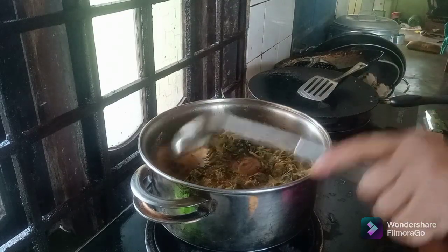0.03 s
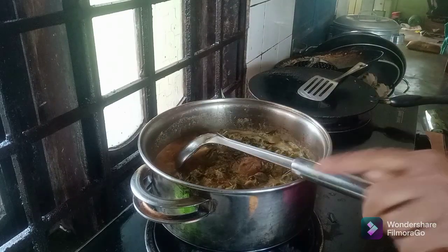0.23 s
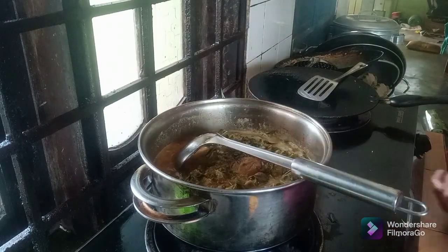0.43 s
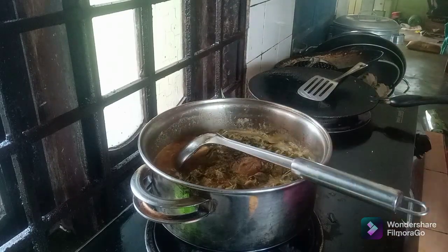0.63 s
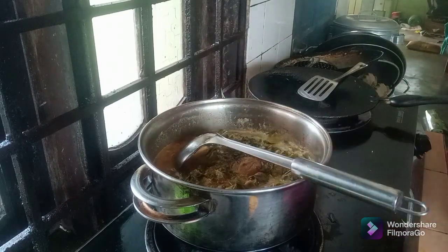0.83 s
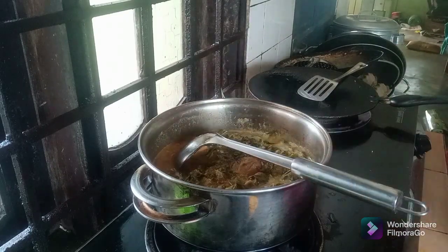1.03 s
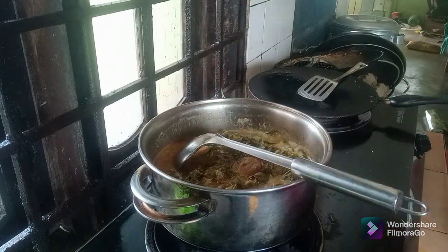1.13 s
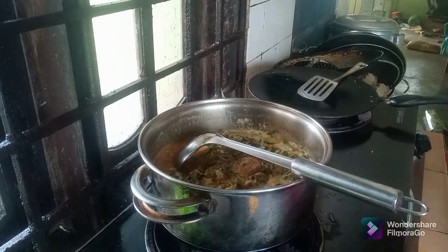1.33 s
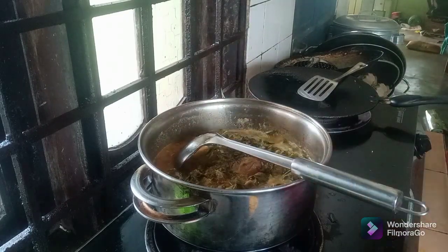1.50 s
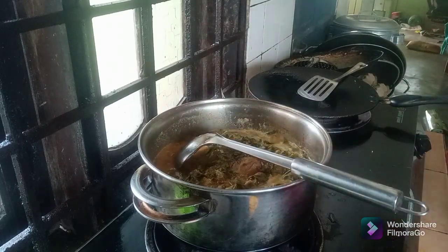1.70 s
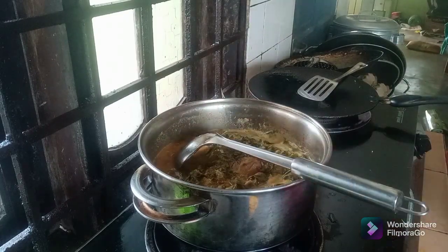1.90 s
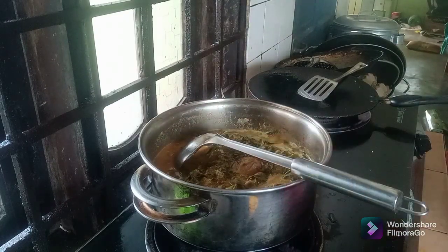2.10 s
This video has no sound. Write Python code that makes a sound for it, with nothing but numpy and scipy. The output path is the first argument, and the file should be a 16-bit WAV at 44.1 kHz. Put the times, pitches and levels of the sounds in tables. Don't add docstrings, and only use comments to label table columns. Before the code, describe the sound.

A metal ladle knocks sharply on the rim of a steel pot of stew and bounces once, brightly; faint taps, a short squeaky scrape and light clinks follow in a quiet small kitchen, heard close on a phone microphone.

```python
import sys
import numpy as np
from scipy import signal
from scipy.fft import rfft, irfft
from scipy.io import wavfile
from scipy.ndimage import map_coordinates

SR = 44100
rng = np.random.default_rng(int(sys.argv[2]) if len(sys.argv) > 2 else 0)


def file_out(sig):
    cols = np.atleast_2d(sig).T
    lim = np.clip(cols, -1, 1)
    pcm = np.round(lim * 32767).astype(np.int16)
    wavfile.write(sys.argv[1], SR, pcm)


def volts_from_decibels(level):
    exponent = np.asarray(level, float) / 20
    return 10 ** exponent


N = 94815
RING_S = 0.6


def unit(x):
    return x / np.sqrt(np.mean(x ** 2) + 1e-20)


def along(points, hz):
    f, v = np.transpose(points)
    return np.interp(np.log(hz + 1), np.log(f + 1), v)


def curves(rows):
    s, *cols = np.transpose(rows)
    return [np.interp(np.arange(N) / SR, s, c) for c in cols]


def wobble(rate, size=N):
    knots = rng.standard_normal(int(N * rate / SR) + 4)
    return map_coordinates(knots, [np.arange(size) * rate / SR])


def noise(spectrum, size=N):
    white = rfft(rng.standard_normal(size))
    colour = volts_from_decibels(along(spectrum, np.fft.rfftfreq(size, 1 / SR)))
    return unit(irfft(white * colour, size))


def add(track, s, sound):
    part = track[max(round(s * SR), 0):][:len(sound)]
    part += sound[:len(part)]


def strike(pitches, modes, attack_s, flutter_db, tilt_db):
    t = np.arange(round(RING_S * SR)) / SR
    ring = np.zeros(len(t))
    for hz, (db, t60) in zip(pitches, modes):
        level_db = db + tilt_db * np.log2(hz / 4000) - 60 * t / t60
        level_db = level_db + flutter_db * wobble(120, size=len(t))
        blur = (0.53 + hz / 14000) * wobble(152, size=len(t))
        ring += volts_from_decibels(level_db) * np.sin(2 * np.pi * hz * t + blur)
    fade = np.cos(np.pi / 2 * t / RING_S)
    return ring * (1 - np.exp(-t / attack_s)) * fade


def burst(spectrum, attack_s, t60_s, grain_db):
    t = np.arange(round(RING_S * SR)) / SR
    hiss = noise(spectrum, size=len(t))
    level = volts_from_decibels(grain_db * wobble(300, size=len(t)) - 60 * t / t60_s)
    return hiss * level * (1 - np.exp(-t / attack_s))


# start in seconds, peak level in dB.
KNOCK = [
    (.206, 0),
]
# start in seconds, peak level in dB.
TOUCH = [
    (.004, -37),
    (.194, -40.5),
]
# pitches in Hz, then for each its level in dB and seconds to die by 60 dB.
RIM_HZ = [370, 808, 1172, 1243, 1343, 1480, 2300, 2406, 4280, 4790, 5389, 6632, 6826, 7515]
RIM = [(-12.5, 0.059), (-3.5, 0.059), (-31, .06), (-11.5, 0.095), (-10, 0.055), (2.5, 0.062), (4, 0.022),
       (-0.5, 0.031), (-15.5, 0.026), (-18, 0.13), (-12.5, 0.053), (-20, 0.045), (-19, 0.064),
       (-8.5, 0.035)]
# pitches in Hz, then for each its level in dB and seconds to die by 60 dB.
BODY_HZ = [657, 1050, 1240, 1340, 1432, 1534, 1669, 2137, 2514, 3989, 4845, 5943, 6632, 6821]
BODY = [(-13, .12), (-9, .5), (-4.5, .4), (-6, .4), (-2.5, 0.39), (-3, 0.55), (-8.5, 0.56), (-14, .3),
        (-10.5, .3), (-10.5, .25), (-9, .6), (-8, .3), (-7.5, 0.34), (-11.5, 0.34)]
# pitches in Hz, then for each its level in dB and seconds to die by 60 dB.
LADLE_HZ = [1787, 2150, 4436, 5152, 6126, 6589, 7203, 7472, 9125, 10230, 11280, 11480, 14550, 15340]
LADLE = [(-8.5, 0.074), (-7, .02), (-22, 0.037), (-5.5, 0.043), (-13.5, .08), (-22.5, 0.038), (0.5, 0.065),
         (-25, 0.026), (-16.5, 0.036), (-21, .05), (-5.5, 0.034), (-12, 0.033), (-26, .05), (-18, 0.11)]
# frequency in Hz, level in dB per Hz.
CLANG = [(120, -49), (350, -19.5), (500, -31), (800, -12.5), (1450, -9), (2800, -15), (3700, -22),
         (5000, -13), (8500, -25), (15000, -39)]
# frequency in Hz, level in dB per Hz.
RATTLE = [(80, -26), (170, -12.5), (650, -20.5), (1300, -6.5), (3300, -23.5), (5200, -15), (7600, -27.5),
          (10500, -30.5), (15000, -46.5)]


def knock():
    out = np.zeros(N)
    rise_s = 0.003
    for s, db in KNOCK:
        rim = volts_from_decibels(db - 7) * strike(RIM_HZ, RIM, rise_s, flutter_db=3.0, tilt_db=1.5)
        clang = volts_from_decibels(db - 2.5) * burst(CLANG, rise_s, 0.026, grain_db=1.0)
        rattle = volts_from_decibels(db - 30.5) * burst(RATTLE, 0.0056, 0.59, grain_db=3.0)
        body = volts_from_decibels(db - 26.5) * strike(BODY_HZ, BODY, 0.0047, flutter_db=3.5, tilt_db=0)
        add(out, s - 0.001, rim + clang + rattle)
        add(out, s, body)
    for s, db in TOUCH:
        ring = volts_from_decibels(db) * strike(LADLE_HZ, LADLE, 0.0072, flutter_db=2.0, tilt_db=-11.0)
        contact = volts_from_decibels(db - 1.5) * burst(CLANG, 0.0012, 0.027, grain_db=-3.0)
        add(out, s, ring + contact)
    return out


# start in seconds, peak level in dB.
BOUNCE = [
    (0.3128, -9.5),
]
# frequency in Hz, level in dB per Hz.
SHIMMER = [(1200, -12.5), (2200, -1), (5000, -4.5), (9000, -11), (12500, -12), (15000, -8.5)]


def bounce():
    out = np.zeros(N)
    for s, db in BOUNCE:
        ring = volts_from_decibels(db - 1) * strike(LADLE_HZ, LADLE, 0.0018, flutter_db=3.5, tilt_db=-0.5)
        shimmer = volts_from_decibels(db - 9) * burst(SHIMMER, 0.0002, 0.014, grain_db=-4.0)
        add(out, s - 0.002, ring + shimmer)
    return out


# start in seconds, peak in dB, brightness in dB per octave, crack in dB.
CLINKS = [
    (1.399, -38, -3, -40),
    (1.801, -41, .5, -45),
    (1.957, -23, 1, -14),
]
# pitches in Hz, then for each its level in dB and seconds to die by 60 dB.
SPOON_HZ = [2482, 3618, 4899, 6228, 7461, 8672, 9238, 13190, 14270, 15400]
SPOON = [(3.5, 0.096), (0, .12), (4.5, 0.055), (-9, 0.064), (-12, .11), (-16.5, 0.079), (-15, .05),
         (-17, .05), (-10, 0.055), (-15, 0.15)]
# level in dB, seconds to die by 60 dB.
SPOON_LIGHT = [(-5, 0.18), (1, 0.07), (3.5, 0.094), (-24, .05), (-8, 0.057)]
# frequency in Hz, level in dB per Hz.
SPARK = [(1500, -10), (4500, -4.5), (5700, -9), (8900, -4.5), (11000, -8.5), (14500, -10), (15400, -6)]


def clinks():
    out = np.zeros(N)
    for s, db, tilt_db, crack_db in CLINKS:
        modes = SPOON if db > -30 else SPOON_LIGHT
        ring = volts_from_decibels(db - 7.5) * strike(SPOON_HZ, modes, 0.0046, flutter_db=4.5, tilt_db=tilt_db)
        crack = volts_from_decibels(db + crack_db) * burst(SPARK, 0.00099, 0.08, grain_db=1.0)
        add(out, s, ring + crack)
    return out


# start in seconds, peak level in dB.
SCRATCHES = [(1.566, -35), (1.579, -39), (1.8, -36), (1.3, -50), (.635, -50), (.73, -52.5), (1.33, -45),
             (1.355, -45), (0.018, -44), (2.095, -40), (2.012, -38), (2.07, -40), (.045, -47)]
# frequency in Hz, level in dB per Hz.
SCRATCH = [(500, -13.5), (3000, -8.5), (5000, -15.5), (16000, -39.5)]


def scratches():
    out = np.zeros(N)
    for s, db in SCRATCHES:
        add(out, s - 0.002, volts_from_decibels(db) * burst(SCRATCH, 0.0037, 0.064, grain_db=0.0))
    return out


# start in seconds, peak level in dB, pitch in Hz, seconds to die by 60 dB.
TAPS = [(.258, -23, 1270, .04), (.269, -28, 1230, .04), (.278, -27, 1280, .04), (.515, -38, 1396, 0.056),
        (.528, -41, 1255, .08), (.611, -42.5, 1446, 0.038), (.64, -50.5, 652, 0.1), (.766, -44, 671, .04),
        (.78, -42, 1434, 0.057), (.813, -39.5, 1520, 0.038), (.83, -44, 1540, 0.036),
        (.828, -45, 650, 0.042), (.87, -49, 655, .09), (.899, -45, 1460, 0.12), (.914, -47.5, 696, 0.091),
        (1.036, -45.5, 1460, .05), (1.053, -39, 1468, 0.049), (1.067, -40.5, 1665, 0.061),
        (1.134, -46, 1467, 0.036), (1.233, -26, 1597, 0.032), (1.25, -44, 1228, .03),
        (1.397, -27.5, 1063, 0.059), (1.421, -24.5, 857, .02), (1.428, -27.5, 1270, .04),
        (1.438, -29, 1490, 0.038), (1.446, -28.5, 806, .02), (1.659, -39.5, 1600, 0.038),
        (1.669, -37, 1374, 0.075), (1.69, -43, 1626, 0.074), (1.75, -46.5, 834, 0.06),
        (1.77, -42, 1447, 0.074), (1.9, -40.5, 1598, 0.066), (1.977, -26.5, 1223, .03),
        (2.037, -40, 1400, .03), (2.05, -25, 1530, 0.032), (2.1, -30.5, 1600, .04), (2.12, -19, 1299, .022),
        (2.132, -45, 1170, .04)]
# start in seconds, peak level in dB, pitch in Hz, seconds to die by 60 dB.
TICKS = [(1.855, -44, 2000, 0.075), (1.2, -47.5, 3600, 0.035), (1.344, -47, 3700, .07),
         (1.374, -47, 4200, .05), (1.428, -39, 2400, 0.047), (1.568, -32.5, 3000, 0.033),
         (2.004, -25, 3520, .025), (2.004, -36, 4800, 0.032), (2.025, -39, 5200, 0.033),
         (2.066, -39, 2900, .03), (2.138, -39.5, 5100, .03), (0.69, -51, 3300, .08),
         (1.915, -54, 3800, 0.043), (.01, -41.5, 3100, .04)]


def taps():
    out, t = np.zeros(N), np.arange(SR // 6) / SR
    fade = np.cos(3 * np.pi * t)
    for s, db, hz, t60 in TAPS + TICKS:
        fuzz = noise([(hz / 2.2, -36), (hz, 0), (hz * 1.6, -32), (hz * 3, -70)], size=len(t))
        rise = (1 - np.exp(-t / (0.033 * t60))) ** 2
        tone = np.sin(2 * np.pi * hz * t)
        add(out, s - 0.002, volts_from_decibels(db - 60 * t / t60) * rise * fade * (tone + fuzz))
    return out


# time in seconds, level in dB.
SCRAPE = [
    (1.393, -110),
    (1.399, -39.5),
    (1.45, -41),
    (1.47, -47),
    (1.55, -53.5),
]
# time in seconds, pitch in Hz, level in dB.
SQUEAK = [
    (1.455, 1290, -46),
    (1.478, 1370, -32.5),
    (1.52, 1460, -34),
    (1.534, 1420, -42),
    (1.545, 1290, -82),
]
# frequency in Hz, level in dB per Hz.
STEW = [(150, -21.5), (300, -3), (650, -12), (1400, -3), (2100, -15.5), (4300, -21.5), (5500, -17),
        (9000, -47.5)]


def scrape():
    push_db, = curves(SCRAPE)
    hz, db = curves(SQUEAK)
    start_s, end_s = SCRAPE[0][0], SCRAPE[-1][0]
    sample = np.arange(N)
    live = (push_db > SCRAPE[0][1]) & (sample < end_s * SR)
    turn = 2 * np.pi * np.cumsum(hz * (1 + 0.022 * wobble(150))) / SR
    squeak = 0.9 * volts_from_decibels(db + 3.4 * wobble(110)) * (np.sin(turn) + volts_from_decibels(-19) * np.sin(2 * turn))
    squeak = squeak * (sample > SQUEAK[0][0] * SR)
    grains = blips(count=70, start_s=start_s, end_s=end_s)
    drag = volts_from_decibels(push_db) * (grains + volts_from_decibels(-2.5) * noise(STEW))
    return live * (drag + squeak)


# centre in Hz, share of the blips.
BLIP_HZ = [(650, .25), (1150, 0.21), (1520, .3), (2200, 0.14), (2800, .12), (3500, 0.09)]


def blips(count, start_s, end_s):
    length_s, scatter_db, tilt_db = 0.014, 4.5, -4
    when, pick, size = rng.random((count, 3)).T
    centres, share = np.transpose(BLIP_HZ)
    hz = centres[np.searchsorted(np.cumsum(share) / share.sum(), pick)]
    hz = hz * (1 + 0.066 * rng.standard_normal(count))
    u = np.arange(round(length_s * SR))
    level = volts_from_decibels(tilt_db * np.log2(hz / 1000) + scatter_db * 2 * size)
    swell = np.sin(np.pi * np.sqrt(u / len(u))) ** 2
    grains = level[:, None] * np.sin(2 * np.pi * hz[:, None] * u / SR) * swell
    at = ((start_s + when * (end_s - start_s)) * SR).astype(int)[:, None] + u
    track = np.bincount(at.ravel(), grains.ravel(), N + SR)[:N]
    return unit(track) * np.sqrt((end_s - start_s) * SR / N)


# start in seconds, level in dB, pitch in Hz, seconds to die by 60 dB.
THUMPS = [
    (.003, -48, 146.5, 0.14),
    (0.226, -30.5, 99.5, 0.17),
    (.3, -41, 77, 0.42),
    (0.961, -42.5, 96, 0.15),
    (1.438, -38.5, 100, 0.19),
    (1.962, -46, 92.8, 0.46),
    (2.065, -27, 318, 0.036),
]


def thumps():
    out, t = np.zeros(N), np.arange(SR // 2) / SR
    for s, db, hz, t60 in THUMPS:
        level = volts_from_decibels(db - 60 * t / t60 + 2.8 * wobble(25, size=len(t)))
        add(out, s, level * (1 - np.exp(-t / 0.0022)) * np.sin(2 * np.pi * hz * t))
    return out


# time in seconds, effort in dB.
EFFORT = [(0, -44), (.05, -54), (.11, -64), (.19, -76), (.5, -53.5), (.58, -71.5), (.66, -54.5), (.72, -63),
          (.92, -53), (1.01, -65), (1.07, -51.5), (1.12, -62), (1.26, -57.5), (1.35, -58.5), (1.62, -70),
          (1.69, -52), (1.84, -61), (1.87, -51), (1.94, -58), (2.0, -46.5)]


def rustle():
    effort_db, = curves(EFFORT)
    lumps = volts_from_decibels(1.5 * wobble(30))
    bubbling = blips(count=1500, start_s=0, end_s=N / SR)
    return volts_from_decibels(effort_db) * (bubbling + volts_from_decibels(-5) * lumps * noise(STEW))


# pitch in Hz, level in dB.
POT = [
    (5900, -73),
    (11400, -85.5),
]
# pitches in Hz, then for each its level in dB and seconds to die by 60 dB.
WALL_HZ = [1245, 1780, 3065, 4860, 5900]
WALL = [(-4, .3), (-4, .25), (-3, .3), (-9, .3), (-11, .35)]
# start in seconds, level in dB.
WALL_BLOWS = [
    (.005, -49.5),
    (0.321, -38),
    (.415, -48.5),
    (.497, -43.5),
]


def pot_wall():
    t = np.arange(N) / SR
    out = np.zeros(N)
    for hz, db in POT:
        level = volts_from_decibels(db) * volts_from_decibels(3 * wobble(25))
        out += level * np.sin(2 * np.pi * hz * t + 2.5 * wobble(120))
    for s, db in WALL_BLOWS:
        add(out, s, volts_from_decibels(db) * strike(WALL_HZ, WALL, 0.0033, flutter_db=2.5, tilt_db=2))
    return out


# frequency in Hz, level in dB per Hz.
AIR = [(120, -24.5), (200, 4.5), (650, 6.5), (970, -32.5), (1560, -15), (2000, -4.5), (5900, -11.5),
       (8000, -18.5), (12500, -27), (15000, -30.5)]
# frequency in Hz, level in dB per Hz.
HUM = [(30, -29.5), (90, -3), (130, -10.5), (165, -4.5), (200, -26), (240, -8), (400, -51.5)]


def air_and_hum():
    return volts_from_decibels(-62.5) * noise(AIR) + volts_from_decibels(-57.5 + 3.3 * wobble(7.14)) * noise(HUM)


# frequency in Hz, seconds to die by 60 dB.
KITCHEN = [(200, 0.81), (1500, 0.54), (6000, 0.44), (15000, 0.27)]


def room(x):
    hz, t, z = signal.stft(rng.standard_normal(SR), SR, nperseg=256)
    decay = volts_from_decibels(-60 * t / along(KITCHEN, hz)[:, None])
    tail = signal.istft(z * decay, SR, nperseg=256)[1]
    late = np.pad(x, (300, 0))
    return signal.fftconvolve(late, tail / np.linalg.norm(tail))[:N]


def scene():
    parts = [(knock(), -9), (bounce(), -8), (clinks() + scratches() + taps() + scrape(), -11.5)]
    mix = sum(x + volts_from_decibels(echo_db) * room(x) for x, echo_db in parts)
    return (mix + thumps() + rustle() + pot_wall() + air_and_hum())[None]


def low_pass(x):
    return signal.sosfilt(signal.butter(12, 16810, fs=SR, output="sos"), x)


def record(dry):
    hz = np.fft.rfftfreq(N, 1 / SR)
    held = np.clip(dry, -1, 1)
    top_cut = volts_from_decibels(-25 * np.clip((hz - 15700) / 250, 0, 1))
    mix = irfft(rfft(held) * top_cut, N)
    return low_pass(mix)


dry = scene()
out = record(dry)
file_out(out)
```